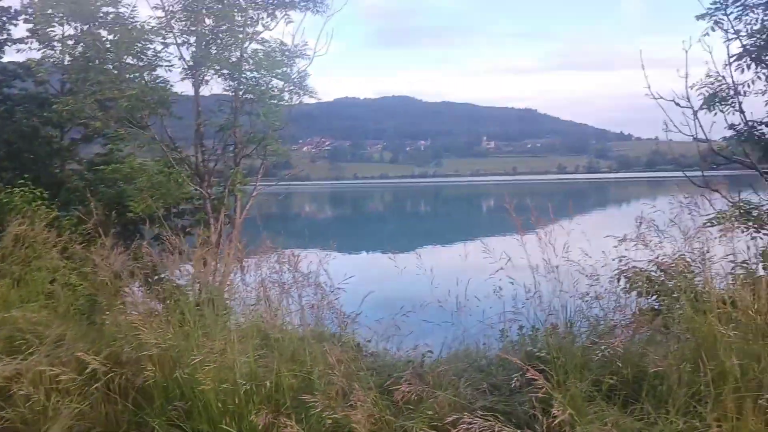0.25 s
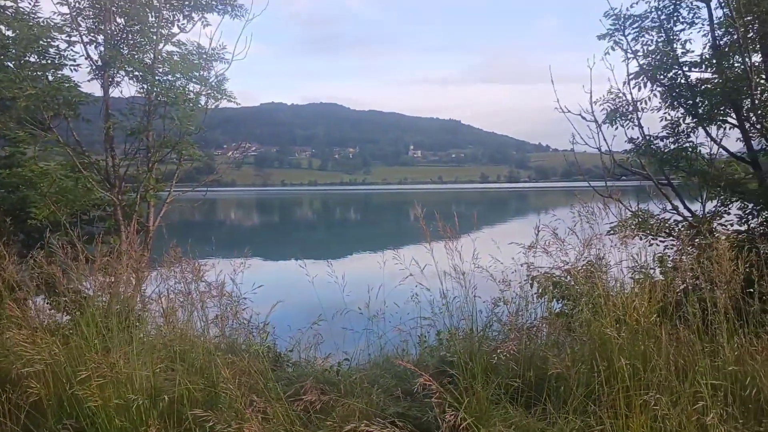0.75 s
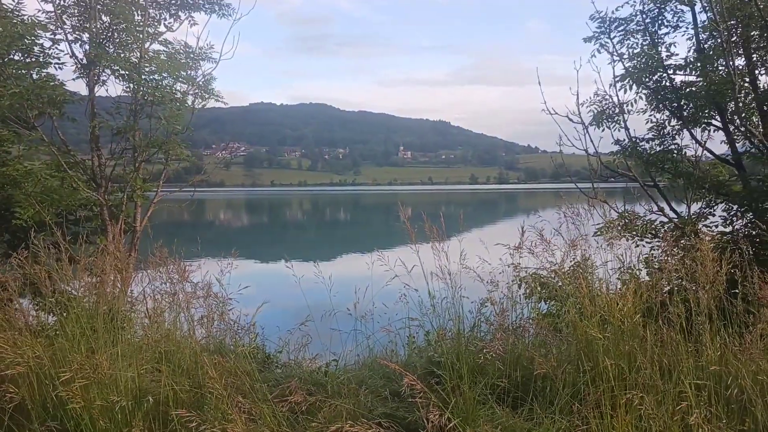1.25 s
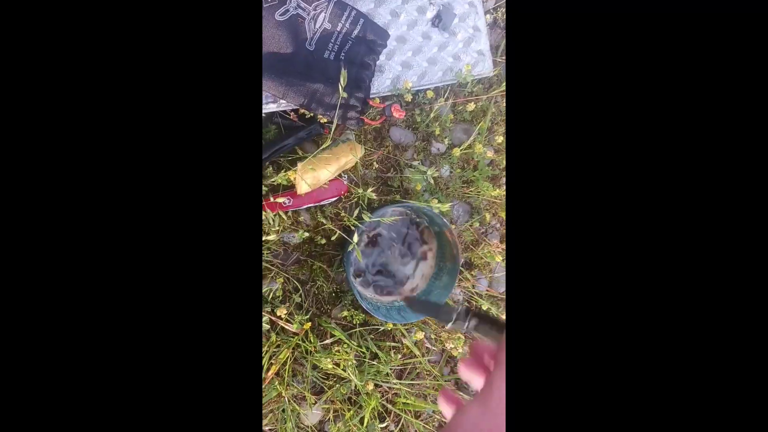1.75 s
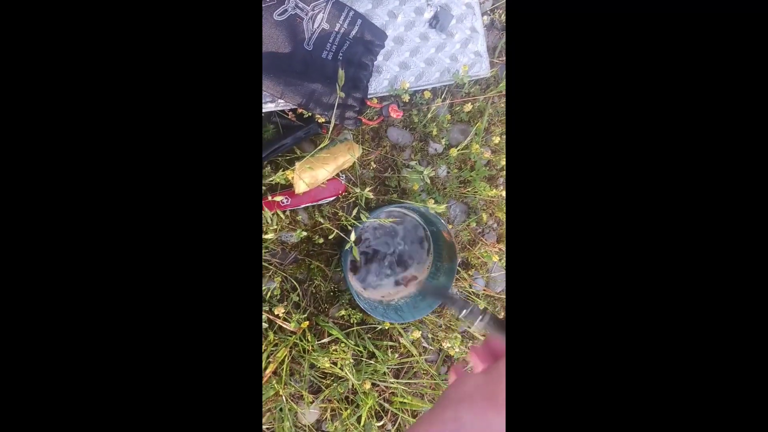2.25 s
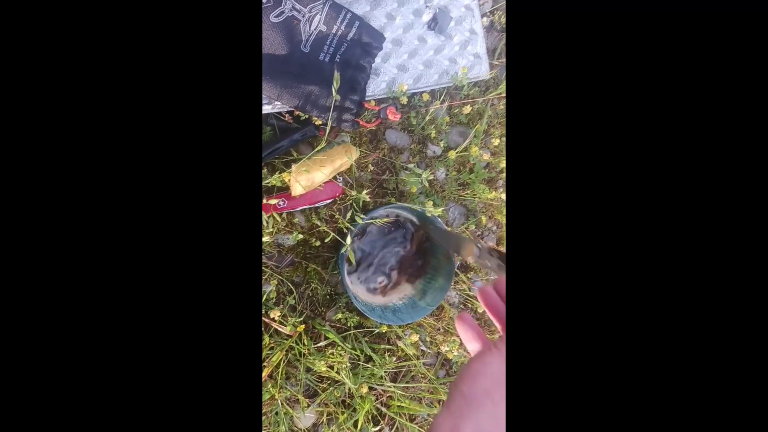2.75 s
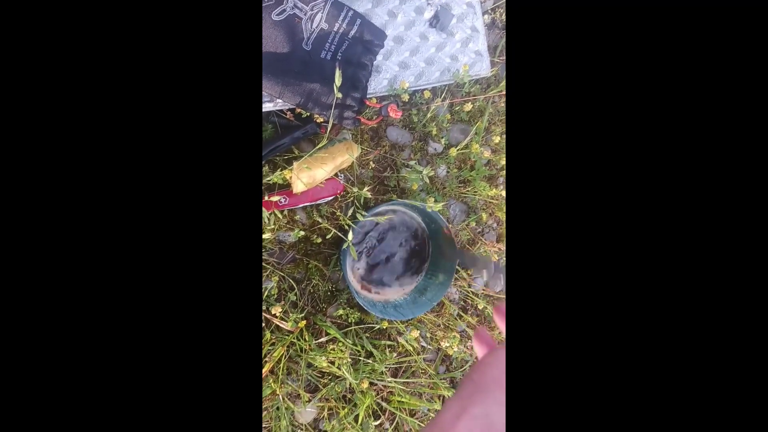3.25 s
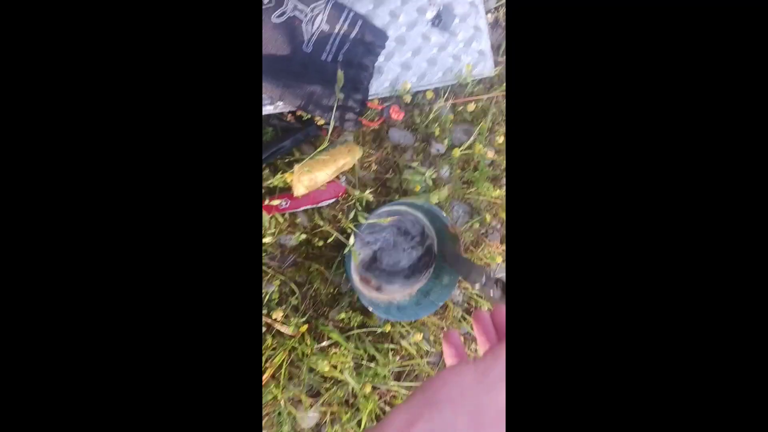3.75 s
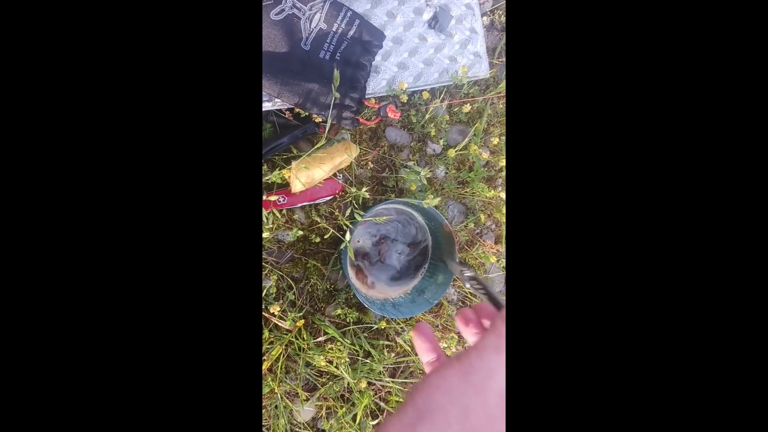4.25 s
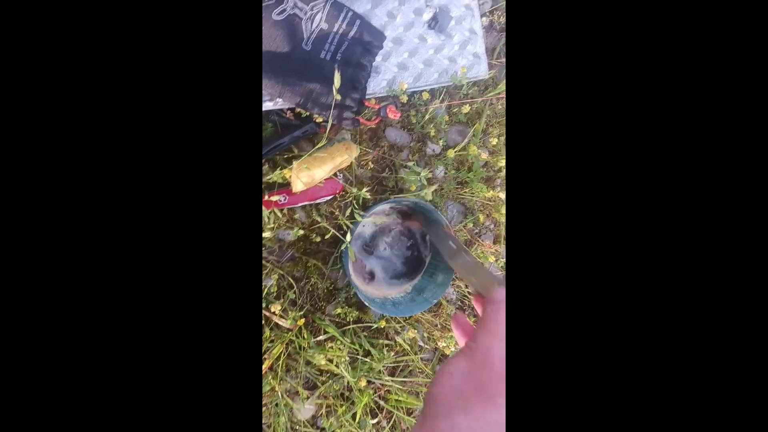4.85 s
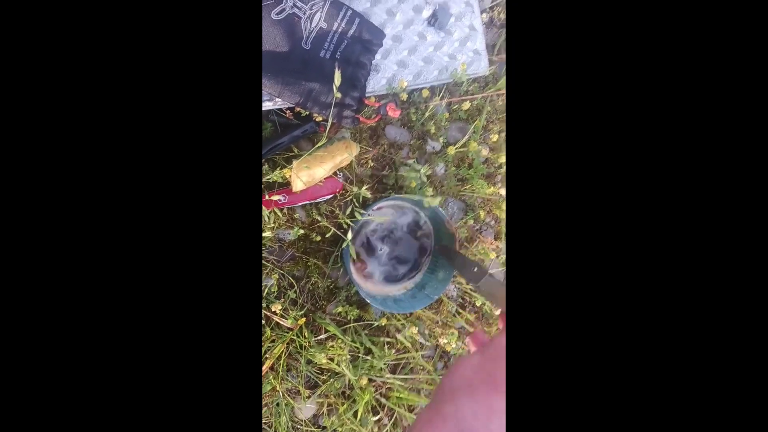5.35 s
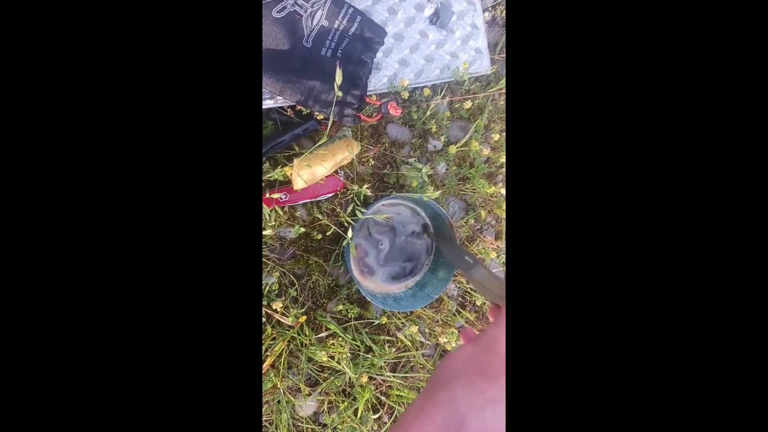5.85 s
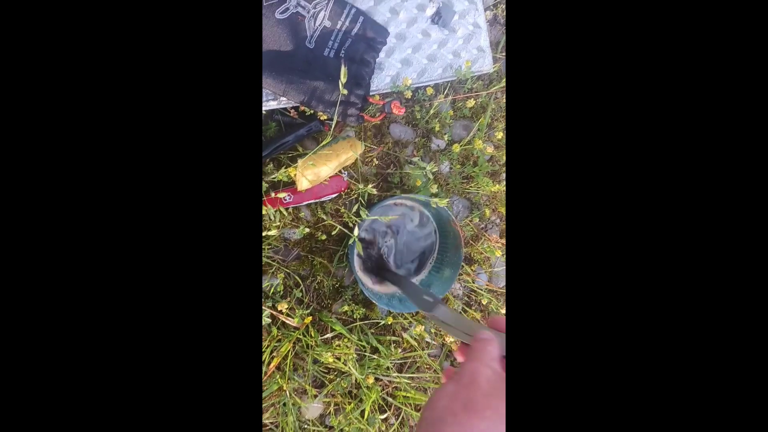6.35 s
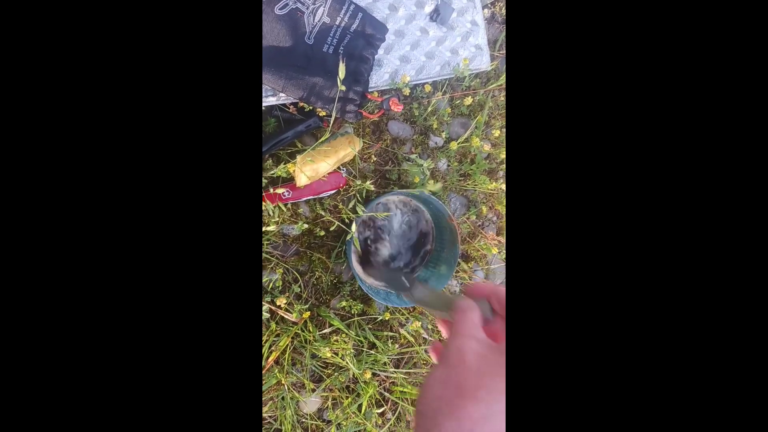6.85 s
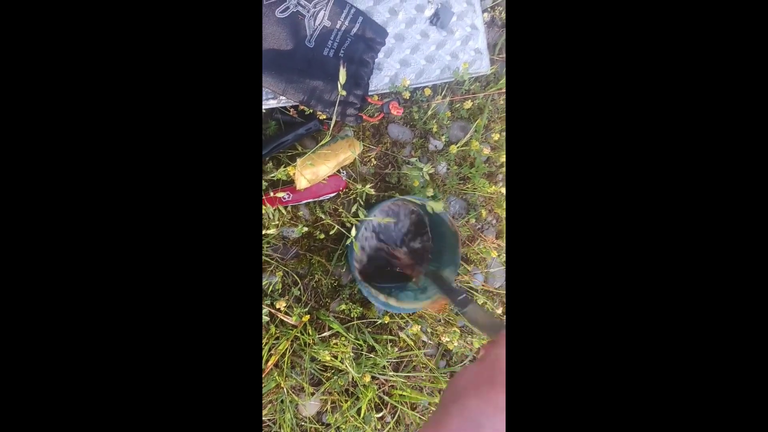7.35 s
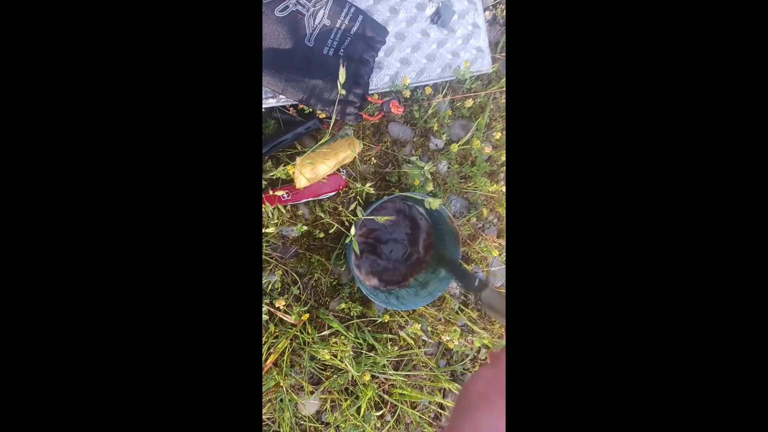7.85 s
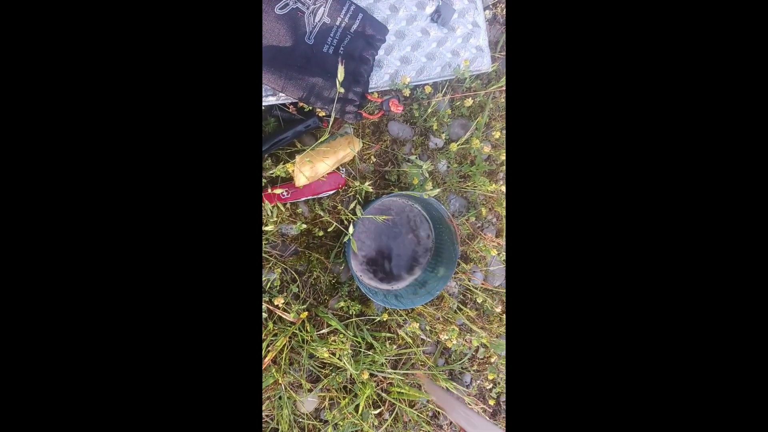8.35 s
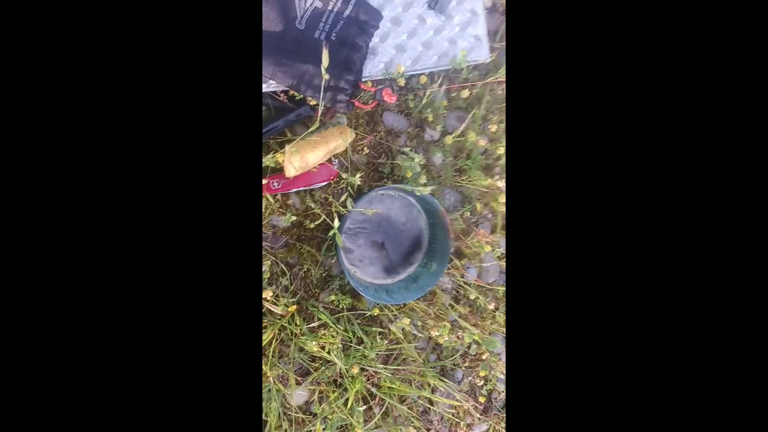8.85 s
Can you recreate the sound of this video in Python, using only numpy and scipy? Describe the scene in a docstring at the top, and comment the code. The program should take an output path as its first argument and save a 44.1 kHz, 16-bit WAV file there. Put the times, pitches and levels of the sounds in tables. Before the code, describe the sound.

Soft outdoor ambience with distant birds lasts about a second and a half, followed by a hard cut to close stirring. The spoon rubs the mug wall in uneven rasping strokes, then grates along the bottom, with sharp short knocks that hardly ring. Birds chirp over a slowly growing distant rumble. Finally the spoon leaves, brushing grass. The near stereo microphone favours the left side.

```python
"""A quiet lakeside with birds, then, after a short silence, an outdoor spot close to a damped plastic mug.
A metal spoon stirs a drink: strokes drive the mug's modes with uneven friction, strikes ring them briefly.
Birds are gliding whistles with echoes; lake, leaves, grass and a swelling far rumble are coloured noise."""
import sys
import numpy as np
from scipy import signal
from scipy.io import wavfile
from scipy.ndimage import uniform_filter1d

SR = 44100
rng = np.random.default_rng(int(sys.argv[2]) if len(sys.argv) > 2 else 0)


def makeup_ratio(level_db):
    """Linear amplitude ratio for a level in decibels (20 dB per factor of ten)."""
    decades = np.asarray(level_db, float) / 20
    return 10 ** decades


def materialize(psi):
    """Save the field psi as 16-bit PCM at rate SR to the path in sys.argv[1].

    A 1-D psi becomes a single channel; in a 2-D psi each row is a channel.
    """
    bounded = np.clip(np.atleast_2d(psi).T, -1, 1)
    quanta = np.round(bounded * 32767).astype(np.int16)
    wavfile.write(sys.argv[1], SR, quanta)


N = 401310

LAKE_FADE_S, LAKE_END_S = 1.44, 1.449  # the lakeside fades out
CLOSE_START_S, CLOSE_FULL_S = 1.47, 1.477  # the close scene fades in


def evened(x):
    """Scales to rms 1."""
    return x / np.sqrt(np.mean(x ** 2) + 1e-20)


def read(points, hz):
    """Looks up a table on a log-frequency axis."""
    f, value = np.transpose(points)
    return np.interp(np.log(hz + 1), np.log(f + 1), value)


def curve(rows, column=1, outside=None):
    """One column of a time table, sample by sample."""
    rows = np.transpose(rows)
    return np.interp(np.arange(N) / SR, rows[0], rows[column], outside, outside)


def colour(x, points):
    """Causal (minimum-phase) filter with the given spectrum and unit noise gain."""
    hz = abs(np.fft.fftfreq(2048, 1 / SR))
    log_gain = np.log(makeup_ratio(np.maximum(read(points, hz), -60)))
    taps = np.fft.ifft(np.exp(np.conj(signal.hilbert(log_gain)))).real[:1024]
    return signal.oaconvolve(x, taps / np.linalg.norm(taps))[:N]


def wander(hz):
    """Random drift of rms 1: chance values, hz of them a second, joined by straight lines."""
    knots = rng.standard_normal(int(N / SR * 40) + 2)
    place = np.arange(N) / SR * np.clip(hz, .1, 39)
    return evened(np.interp(place, np.arange(len(knots)), knots))


# Likeness of left and right background. Each row: frequency in Hz, likeness from 0 to 1.
LIKENESS = [(60, 0.93), (250, 0.86), (1400, 0.3), (15000, 0.046)]
# Tilt of the background to the left. Each row: frequency in Hz, left over right in dB.
LEFT_LEAN = [(60, 2.5), (200, 3.5), (700, 0.5), (1300, 10.5), (2400, 7), (8000, 2), (15000, 7.5)]


def air(points, patchy_db, lag_count):
    """Two-channel noise with drifting patches; the left port is louder and lags by some samples."""
    frames, hz = N // 256 + 5, np.fft.rfftfreq(1024, 1 / SR)
    a, b, c, d, patches = rng.standard_normal((frames, 513, 5)).T
    patches = uniform_filter1d(patches, size=14, axis=0)  # over frequency
    patches = evened(uniform_filter1d(patches, size=16, axis=1))  # over time
    same = np.clip(read(LIKENESS, hz), -1, 1)[:, None]
    left = a + 1j * b
    right = same * left + np.sqrt(1 - same ** 2) * (c + 1j * d)
    left = left * np.exp(-2j * np.pi * hz * lag_count / SR)[:, None]
    lean_db = read(LEFT_LEAN, hz)[:, None] / 2
    spectrum_db = read(points, hz)[:, None] + patchy_db * patches
    z = np.array([left, right]) * makeup_ratio(spectrum_db + np.array([lean_db, -lean_db]))
    x = signal.istft(z, nperseg=1024, noverlap=768)[1][:, :N]
    return x / np.sqrt(np.mean(x.mean(0) ** 2))


# Tone of the lakeside air. Each row: frequency in Hz, relative level in dB per Hz.
LAKE_TONE = [(15, -51), (25, -12.5), (64, 1.5), (285, -19), (620, -24.5), (1000, -17), (1700, -22.5),
             (2050, -30), (3520, -20), (9000, -39), (15500, -31), (15950, -58)]


def lakeside():
    """The steady ambience of the lake: low-heavy noise in slow patches."""
    return makeup_ratio(-67) * air(LAKE_TONE, patchy_db=2.5, lag_count=8.2)


# The leaves stir. Each row: time in seconds, level in dB.
LEAVES_LEVEL = [(0, -88), (.15, -68.5), (.65, -76.5), (.8, -113), (1.28, -101), (1.36, -76), (1.44, -78)]


def leaves():
    """Many small leaf contacts heard as patchy noise around 4 kHz that comes and goes."""
    tone = [(2000, -26.5), (4000, -12.5), (8000, -18.0), (11000, -35.0)]  # (Hz, dB per Hz)
    return makeup_ratio(curve(LEAVES_LEVEL)) * air(tone, patchy_db=4.0, lag_count=5.5)


# Tone of the air around the mug. Each row: frequency in Hz, relative level in dB per Hz.
CAMP_TONE = [(290, -30), (500, -8), (784, -23), (1090, -6.5), (3700, -7), (8700, -26.5), (15500, -20),
             (15950, -39)]


def camp():
    """The ambience around the mug: broad noise in strong patches."""
    return makeup_ratio(-67) * air(CAMP_TONE, patchy_db=5.5, lag_count=19.9)


# Tone of the far rumble. Each row: frequency in Hz, relative level in dB per Hz.
RUMBLE_TONE = [(20, -40), (35, -23.5), (70, -1.5), (115, 1.5), (155, -4.5), (255, 5), (380, -11),
               (800, -32.5)]
# Swell of the rumble. Each row: time in seconds, level of the lows in dB, upper part over the lows in dB.
RUMBLE_SWELL = [(1.47, -67.5, -11), (3.5, -66.5, -9.5), (4.5, -61.5, -12), (6.3, -59.5, -5),
                (7.5, -59.5, -1), (9.1, -60.5, -1.5)]


def rumble():
    """A far low rumble that swells; its upper part grows more as it nears."""
    x = air(RUMBLE_TONE, patchy_db=1.5, lag_count=14.2)
    low = signal.sosfiltfilt(signal.butter(2, 170, fs=SR, output="sos"), x)
    upper = makeup_ratio(curve(RUMBLE_SWELL, column=2)) * evened(x - low)
    return makeup_ratio(curve(RUMBLE_SWELL)) * (evened(low) + upper)


# Hand and spoon brush through grass. Each row: time in seconds, level in dB.
SWISH_LEVEL = [(7.85, -64), (8., -79.5), (8.1, -63), (8.3, -80), (8.42, -70), (8.55, -55), (8.75, -67.5),
               (9.1, -63)]
# Tone of the brushed grass. Each row: frequency in Hz, relative level in dB per Hz.
GRASS_TONE = [(800, -10.5), (1500, 0.5), (3500, -2.5), (5200, 2), (8500, -10.5), (14500, -13.5),
              (16000, -45)]


def grass():
    """Blades brushed by hand and spoon: bright noise that follows the moves."""
    return makeup_ratio(curve(SWISH_LEVEL, outside=-200.)) * air(GRASS_TONE, patchy_db=1.5, lag_count=22)


def chorus(count):
    """Faint far birds: short gliding notes at chance times and pitches, in rows like those of the near birds."""
    s, hz, glide, length, db = rng.random((count, 5)).T
    start_s, length_s = s * (N / SR - .2), .02 + .03 * length
    hz, glide = 2600 + 3000 * hz, 900 * (glide - .5)
    return list(zip(start_s, length_s, hz - glide, hz, hz + glide, -86 + 8 * db))


# Bird notes. Each row: start in seconds, length in seconds, first pitch in Hz, middle pitch in Hz,
# last pitch in Hz, level in dB at the start of the note, before flutter, echoes and left-right lean.
BIRD_NOTES = [(.505, .06, 3270, 3060, 3200, -67), (.57, .09, 3440, 3450, 3450, -72),
              (.845, .045, 3660, 3580, 3500, -70), (.797, .05, 5900, 5000, 5900, -75),
              (.92, .05, 1970, 2020, 2040, -76), (.995, .055, 3640, 3540, 3480, -68),
              (1.05, .04, 2000, 2100, 2060, -77), (1.23, .11, 1820, 1870, 1760, -75),
              (3.48, .04, 4650, 4620, 4580, -69), (3.793, .02, 2750, 2900, 2800, -66),
              (3.853, .025, 2350, 2800, 2950, -64), (3.955, .11, 2950, 3260, 2830, -60),
              (4.46, .025, 3240, 3120, 3000, -60), (4.5, .07, 3250, 3330, 3400, -64),
              (4.69, .05, 3200, 3050, 2850, -58), (5.81, .065, 2600, 2620, 2640, -65),
              (6.24, .05, 2790, 2650, 2510, -65), (7.862, .048, 2240, 2460, 2200, -65),
              (7.985, .062, 2820, 2850, 2480, -61), (8.043, .05, 2480, 2880, 3050, -60),
              (8.16, .145, 3750, 3180, 2470, -62), (8.437, .078, 3500, 3160, 3400, -58),
              (8.51, .045, 3400, 3410, 3380, -64), (8.615, .04, 2170, 2280, 2700, -61),
              (8.65, .058, 2680, 2690, 2410, -57), (8.66, .065, 3200, 3160, 3130, -68),
              (8.79, .042, 3750, 3350, 2650, -62), (8.99, .065, 3780, 3680, 3530, -65),
              (9.07, .03, 3140, 3050, 2950, -55)]


def birds():
    """Near-pure, slightly fluttering whistles from the trees, with blurred echoes; the right port leads."""
    song = np.zeros(N + SR)
    for start, length, first_hz, middle_hz, last_hz, db in BIRD_NOTES + chorus(count=160):
        t = np.arange(0, length, 1 / SR)
        u = t / length
        bend_hz = (2 * middle_hz - first_hz - last_hz) * 2 * u * (1 - u)
        pitch_hz = first_hz + (last_hz - first_hz) * u + bend_hz
        note = np.sqrt(2) * makeup_ratio(db) * np.sin(2 * np.pi * np.cumsum(pitch_hz) / SR)
        shape = signal.windows.tukey(len(t), .25) * makeup_ratio(-2. * u)  # each note sinks by 2 dB
        song[int(start * SR):][:len(t)] += note * shape
    song = song[:N] * makeup_ratio(2.4 * wander(39))
    blur = rng.standard_normal((2, 6000)) * makeup_ratio(-60 * np.arange(6000) / SR / 0.3)  # 60 dB down in 0.3 s
    echoes = signal.oaconvolve(song[None], blur / np.linalg.norm(blur[0]), axes=1)[:, :N]
    at_lake = np.arange(N) < LAKE_END_S * SR
    echo_db = np.where(at_lake, 2., -8.)
    lean_db = np.where(at_lake, 1., 4.8)  # added left, taken off right
    direct = np.array([np.roll(song, 22), song])
    return (direct + makeup_ratio(echo_db) * echoes) * makeup_ratio(np.array([lean_db, -lean_db]))


# Strokes of the spoon. Each row: start in seconds, swell in seconds, fade in seconds,
# pressure in dB at the hardest point, fine grit over the pressure in dB.
SPOON_STROKES = [(1.472, 0.026, 0.041, -56.5, 2), (1.591, 0.011, 0.089, -60.5, -10),
                 (1.71, 0.024, 0.12, -50.5, -7), (1.852, 0.028, 0.045, -54.5, -12),
                 (2.107, 0.03, 0.017, -60, -4), (2.161, 0.0067, 0.091, -48, -73),
                 (2.228, 0.061, 0.036, -45, -21), (2.322, 0.078, 0.13, -57.5, -26),
                 (2.562, 0.041, 0.14, -54.5, -16.5), (2.703, 0.0107, 0.015, -42.5, -8),
                 (2.734, 0.016, 0.043, -48.5, -34), (2.88, 0.033, 0.0071, -41, -33),
                 (2.95, 0.055, 0.0093, -49.5, -1.5), (3.075, 0.015, 0.022, -40.5, -10),
                 (3.159, 0.035, 0.036, -44, -11), (3.249, 0.037, 0.02, -46, -14.5),
                 (3.307, 0.04, 0.011, -46, -38), (3.399, 0.026, 0.037, -45, -9.5),
                 (3.513, 0.058, 0.0072, -44, -8.5), (3.609, 0.011, 0.03, -45, -34),
                 (3.654, 0.014, 0.0053, -45.5, -41), (4.033, 0.095, 0.023, -58.5, -36),
                 (4.178, 0.018, 0.041, -64.5, -3), (4.559, 0.051, 0.03, -48.5, -41),
                 (4.745, 0.03, 0.04, -50, -3.5), (4.835, 0.036, 0.011, -46.5, -64),
                 (4.887, 0.016, 0.054, -51, -4), (4.986, 0.051, 0.0099, -46, -8),
                 (5.03, 0.025, 0.003, -53.5, 13.5), (5.077, 0.078, 0.023, -57, 0),
                 (5.21, 0.036, 0.036, -52, 2), (5.326, 0.0058, 0.033, -51.5, 2.5),
                 (5.396, 0.042, 0.027, -48, -6), (5.505, 0.031, 0.01, -52, 10),
                 (5.576, 0.036, 0.065, -58, -8), (5.673, 0.025, 0.052, -61, 9),
                 (5.879, 0.0075, 0.0085, -43.5, -22), (5.986, 0.064, 0.026, -51.5, 1.5),
                 (6.156, 0.033, 0.04, -60, -3), (6.308, 0.044, 0.088, -57, -5.5),
                 (6.384, 0.013, 0.075, -47, -62), (6.537, 0.087, 0.0053, -49, -3),
                 (6.64, .024, 0.057, -56.5, 3), (6.741, 0.042, 0.073, -61, -3),
                 (6.889, 0.056, 0.04, -52, 2), (7.04, 0.069, 0.051, -54, 8.5),
                 (7.266, 0.074, 0.052, -52.5, -1.5), (7.466, 0.038, 0.048, -53, -8),
                 (7.508, 0.0118, 0.02, -36.5, -33), (7.534, 0.0085, 0.071, -54, -5),
                 (7.619, 0.018, 0.039, -49.5, 4), (7.713, 0.045, 0.041, -53, -7),
                 (7.783, 0.036, 0.031, -56, -6)]


def pressure():
    """Each stroke swells to its hardest point and fades; contact is made and lost gradually."""
    level = np.zeros((3, N))  # for low modes, high modes and grit
    edge_db = np.array([[11.5], [16.5], [22]])  # how far each part sinks at the ends of a stroke
    for start, swell, fade, low_db, grit_db in SPOON_STROKES:
        end = start + swell + fade
        at = np.arange(round(start * SR), round((end + .025) * SR))
        away = np.interp(at / SR, [start, start + swell, end], [1, 0, 1])
        touch = np.interp(at / SR, [start, start + .012, end - .005, end + .025], [0, 1, 1, 0])
        # the high modes rise with the grit: both need a fast, light stroke
        part_db = np.array([[0], [7 + 0.4 * grit_db], [grit_db]])
        level[:, at] += touch * makeup_ratio(low_db + part_db - edge_db * away ** 0.45)
    return level


def friction(per_s, uneven_db):
    """Tiny uneven slips under the moving spoon, over a fine hiss; now and then it catches harder."""
    slips = (rng.random(N) < per_s / SR) * makeup_ratio(uneven_db * np.minimum(rng.exponential(1, N), 3))
    slips = evened(slips * rng.choice([-1, 1], N))
    hiss = 1.15 * rng.standard_normal(N)
    catches = (rng.random(N) < 70 / SR) * rng.normal(0, 10, N)  # about 70 a second
    return evened(slips + hiss + catches) * makeup_ratio(2.2 * wander(38))


# Tone of the finest grit. Each row: frequency in Hz, relative level in dB per Hz.
GRIT_TONE = [(4000, -34), (7500, -22.5), (10000, -14.5), (13000, -6.5), (15500, -18.5), (15950, -25)]


def grit(x):
    """Bright colour of hard, tiny contacts between metal and plastic."""
    return colour(x, GRIT_TONE)


# Broad rasp between the modes. Each row: frequency in Hz, relative level in dB per Hz.
RASP_TONE = [(500, -40), (900, 6), (1540, 17.5), (2380, 20), (5550, 11.5)]


def rasp(rub, low, high):
    """Broad scraping noise between the modes: a dull part and a bright part, each with its own pressure."""
    dull = signal.sosfilt(signal.butter(2, 3300, fs=SR, output="sos"), colour(rub, RASP_TONE))
    bright_tone = [(2000, -50.0), (3500, 19.5), (6000, 2.0), (7500, 19.0), (10000, -61.0)]  # (Hz, dB per Hz)
    return makeup_ratio(2.0) * low * dull + makeup_ratio(-2.5) * high * colour(rub, bright_tone)


# Weight of the lowest modes while rubbing. Each row: time in seconds, lowest over the other modes in dB.
LOW_WEIGHT = [(1.5, 28), (2.2, -8.5), (2.6, 3.5), (7.1, 8), (7.3, 16.5)]
# The broad middle mode sits lower early in one scrape, then slides up.
# Each row: time in seconds, share of its nominal pitch, before wavering.
MODE_SLIDE = [(2.15, .82), (2.24, .86), (2.3, 1.03)]
# Modes of mug and spoon. Each row: nominal pitch in Hz, width in Hz while rubbed,
# relative level in dB stirring along the wall, relative level in dB stirring along the bottom.
MUG_MODES = [(1150, 80, -12, -8.5), (1480, 380, -4, -4.5), (1995, 23, -23, -16.5), (2536, 148, 1, -5.5),
             (2752, 53, 0.5, 3), (3744, 114, 3.5, -18), (4230, 29, -7, -16.5), (4817, 123, -1, -8),
             (4610, 52, -17.5, -6), (5350, 274, 7, 0.5), (6920, 76, -13, -11)]


def rubbed_modes(rub, low, high):
    """Rubbing drives the modes; the contact point moves, so each mode comes, goes and wavers."""
    out = np.zeros(N)
    late = np.clip((np.arange(N) / SR - 4.09) / 0.16, 0, 1)  # from the wall to the bottom at 4.09 s
    weight_db, slide = curve(LOW_WEIGHT) / 2, curve(MODE_SLIDE, outside=0.96)
    for hz, width, wall_db, bottom_db in MUG_MODES:
        r = np.exp(-np.pi * width / SR)
        if 2200 < hz < 2600:
            share = slide + .035 * wander(14)
        else:
            share = 1 + 0.014 * wander(9)
        turn = np.exp(2j * np.pi * np.cumsum(hz * share) / SR)
        mode_db = wall_db + late * (bottom_db - wall_db) - 3.0 + 3.34 * wander(22)
        mode_db = mode_db + (weight_db if hz < 1800 else -weight_db)
        drive = rub * (low if hz < 3400 else high) * makeup_ratio(mode_db)
        # a resonator with moving pitch: turned down to 0 Hz, smoothed, turned back
        out += np.sqrt(2 * (1 - r * r)) * (turn * signal.lfilter([1], [1, -r], drive / turn)).real
    return out


# The spoon judders over the bottom in a quick run of small strikes.
# Each row: start in seconds, end in seconds, mean gap in seconds, mean blow in dB.
JUDDER_RUNS = [(4.559, 4.637, 0.011, -36.5), (4.849, 4.865, .0075, -37)]


def judders():
    """Quick small strikes with chance in timing and force, in rows like those of the spoon knocks."""
    runs = [(s, db, gap) for start, end, gap, db in JUDDER_RUNS for s in np.arange(start, end, gap)]
    chance = rng.random((40, 2)) - .5
    return [(s + gap * a / 2, db + 8 * b, -7, 1300) for (s, db, gap), (a, b) in zip(runs, chance)]


# The spoon strikes the mug. Each row: time in seconds, blow in dB, low knock over the blow in dB before RING_DB,
# pitch of the low knock in Hz, set by the spot that is hit.
SPOON_KNOCKS = [(1.5301, -32, 0, 1870), (1.5334, -22, -6.5, 1630), (1.718, -43, 5, 1210),
                (2.166, -29.5, -15, 1800), (2.312, -27.5, -1, 1620), (2.567, -45.5, 16.5, 1550),
                (2.594, -34, 2, 1340), (2.6353, -28, -3.5, 1560), (2.7114, -32, -27, 1580),
                (2.762, -32.5, 0, 1210), (2.8833, -9.5, 1, 1330), (2.967, -27.5, -1, 1550),
                (3.081, -18, -6, 1550), (3.1996, -27, -12, 1580), (3.279, -35, -23, 1600),
                (3.42, -34, -24, 1570), (3.62, -39, 6, 1150), (4.3821, -12.5, -6.5, 1444),
                (4.446, -46, 17.5, 1470), (5.029, -22.5, -15, 1110), (5.098, -37, 10, 1470),
                (5.306, -54.5, 26, 1480), (5.3278, -17, -4, 1440), (5.8, -35.5, -36, 1600),
                (5.8809, -10.5, -1, 1520), (5.904, -41, 12, 1480), (6.1895, -35, -7, 1690),
                (6.407, -22.5, 15, 980), (6.4104, -12.5, 3, 1430), (6.5334, -35.5, 2, 1770),
                (6.614, -26.5, -11, 1070), (6.81, -34.5, -7, 1390), (7.004, -39.5, 7, 1480),
                (7.169, -40, 7.5, 1290), (7.307, -35, 18.5, 1150), (7.335, -19.5, -5, 1140),
                (7.355, -28, 1, 1730), (7.378, -36.5, 8, 1110), (7.476, -41, 19.5, 1420),
                (7.52, -25, -2, 1330), (7.549, -39.5, 14.5, 1220), (7.611, -48, 11, 1150),
                (7.7, -42.5, 18, 1150), (7.768, -32, -10, 1520), (7.827, -41, 21, 1100)]
# Crack of a strike. Each row: frequency in Hz, relative level in dB per Hz.
CRACK_TONE = [(300, -33), (1430, 2.5), (1780, -28), (2790, 7), (3460, -3), (4160, -3), (14500, -38),
              (16000, -9)]
RING_DB, CRACK_DB, TICK_DB = -10.5, -3.5, -8  # parts of a strike, over the blow


def strikes():
    """A sharp push and short rattle ring modes damped by the spoon's lasting touch; plus a bright tick."""
    ring, push, t = np.zeros(N), np.zeros(N), np.arange(1500) / SR
    high_modes = [m for m in MUG_MODES if m[0] > 1800]
    hz, width, wall_db, bottom_db = np.transpose(high_modes)[:, :, None]
    spots = rng.standard_normal((80, len(hz), 1))  # where the blow lands favours some modes
    rattles = rng.standard_normal((80, 400)) * np.exp(-t[:400] / .0016) * .22
    rattles[:, 0] = 1  # the sharp push
    for (s, db, low_db, low_hz), spot, rattle in zip(SPOON_KNOCKS + judders(), spots, rattles):
        at = round(s * SR)
        mode_db = (wall_db + bottom_db) / 2 + 3.4 * spot - 5.5
        # struck modes die 2.6 times faster than rubbed ones
        modes = makeup_ratio(mode_db) * np.exp(-np.pi * 2.6 * width * t) * np.sin(2 * np.pi * hz * t)
        knock = makeup_ratio(low_db) * np.exp(-np.pi * 106 * t) * np.sin(2 * np.pi * low_hz * t)  # 106 Hz wide
        ring[at:at + 1899] += makeup_ratio(db + RING_DB) * np.convolve(modes.sum(0), rattle)
        ring[at:at + 1500] += makeup_ratio(db + RING_DB) * knock
        push[at:at + 400] += makeup_ratio(db) * rattle
    return ring, makeup_ratio(CRACK_DB) * colour(push, CRACK_TONE) + makeup_ratio(TICK_DB) * grit(push)


def spoon():
    """Spoon in mug: rubbing and ringing radiate through the small mug, the crack of each strike directly."""
    low, high, fine = pressure()
    rub = friction(per_s=1500, uneven_db=5.0)
    scrape = rasp(rub, low, high) + rubbed_modes(rub, low, high)
    scrape += makeup_ratio(6.5) * grit(fine * friction(per_s=2100, uneven_db=7.5))
    ring, crack = strikes()
    # a small mug radiates little bass
    small_mug = signal.cheby2(N=4, rs=24, Wn=780, btype="high", fs=SR, output="sos")
    return crack + signal.sosfilt(small_mug, scrape + ring)


def ports(x):
    """The left port faces the mug; the right hears paths that change as the hand moves, and direct lows."""
    smear = rng.standard_normal((2, 300)) * np.exp(-np.arange(300) / (.0008 * SR))  # 0.8 ms decay
    smear /= np.linalg.norm(smear, axis=1, keepdims=True)
    paths = signal.oaconvolve(x[None], smear, axes=1)[:, :N]
    turn = 2.96 * wander(25)
    paths = np.cos(turn) * paths[0] + np.sin(turn) * paths[1]
    right = paths + signal.lfilter(*signal.butter(1, 3430, fs=SR), 0.48 * x - 0.44 * paths)
    return np.array([makeup_ratio(4) * x, makeup_ratio(-4) * right])


def scene():
    """The lakeside fades out, a short silence, then the close scene of the mug fades in; birds sing in both."""
    t, song = np.arange(N) / SR, birds()
    lake = lakeside() + leaves() + song
    close = camp() + rumble() + grass() + song + ports(spoon())
    lake_fade = np.interp(t, [LAKE_FADE_S, LAKE_END_S], [1, 0])
    close_fade = np.interp(t, [CLOSE_START_S, CLOSE_FULL_S], [0, 1])
    return lake * lake_fade + close * close_fade


def band_limit(x):
    """A steep low-pass at the top of the band."""
    return signal.sosfilt(signal.butter(12, 16550, fs=SR, output="sos"), x)


def record(dry):
    """The microphone's band: a soft low cut at 34 Hz and a steep top at 16150 Hz."""
    heard = signal.sosfilt(signal.butter(2, 34, btype="high", fs=SR, output="sos"), dry)
    top = signal.firwin(255, 16150, window=("kaiser", 9), fs=SR)
    heard = signal.oaconvolve(heard, top[None], "same")
    return band_limit(heard)


dry = scene()
out = record(dry)
materialize(out)
```